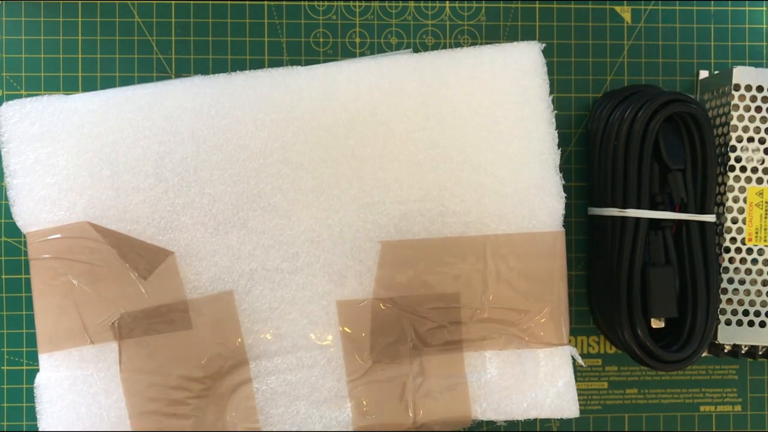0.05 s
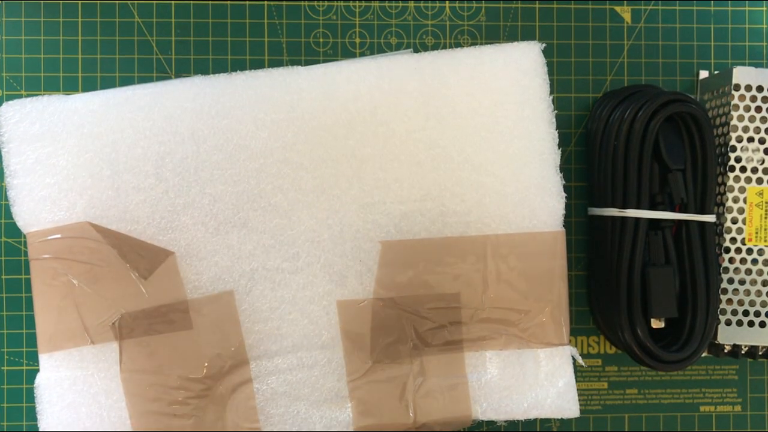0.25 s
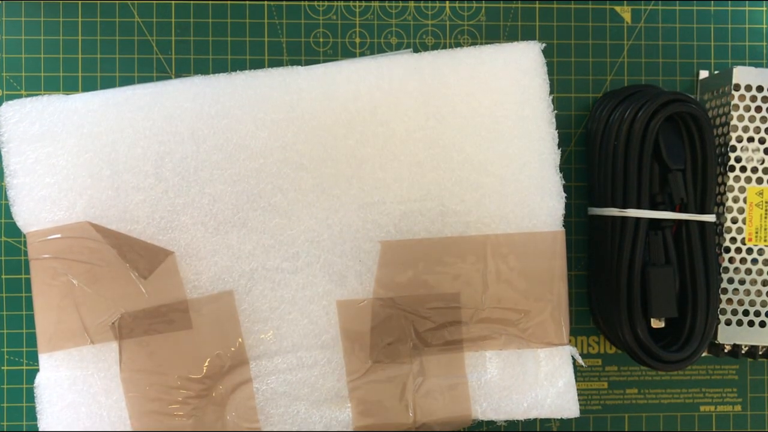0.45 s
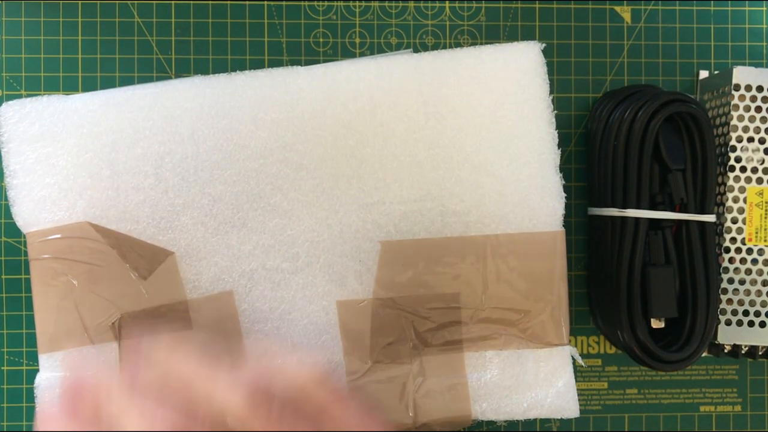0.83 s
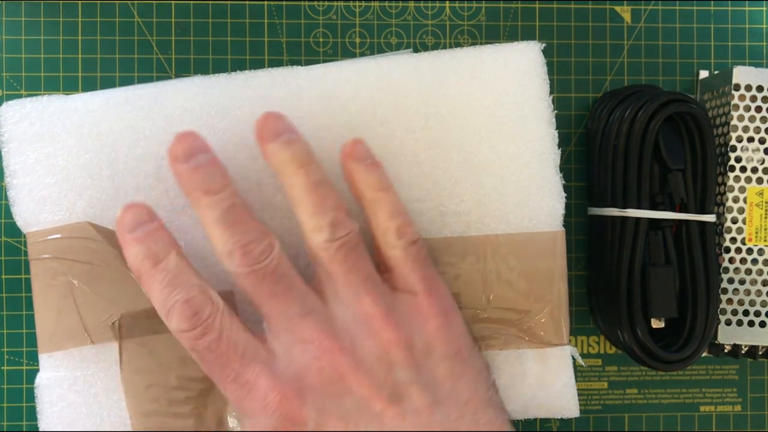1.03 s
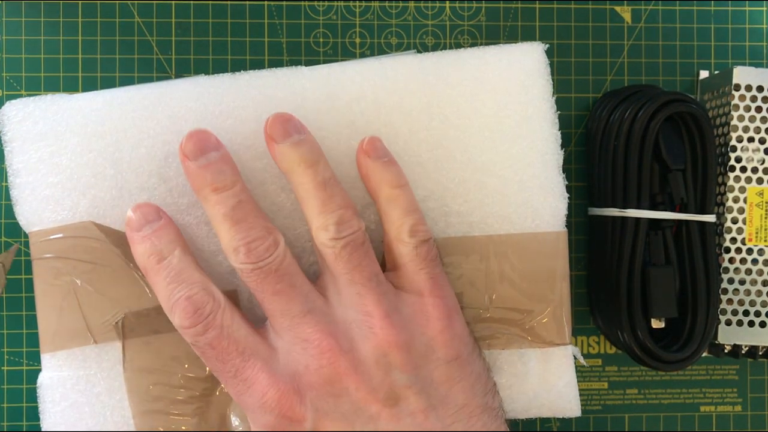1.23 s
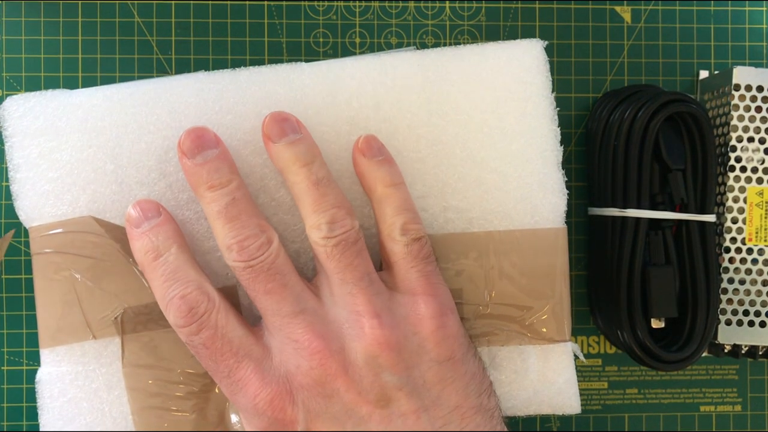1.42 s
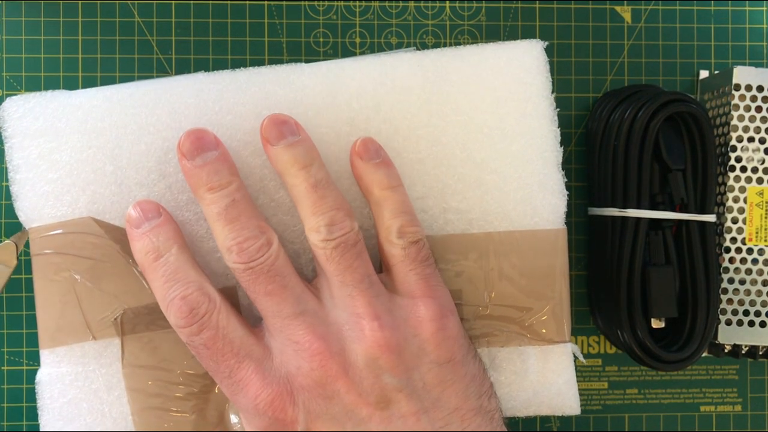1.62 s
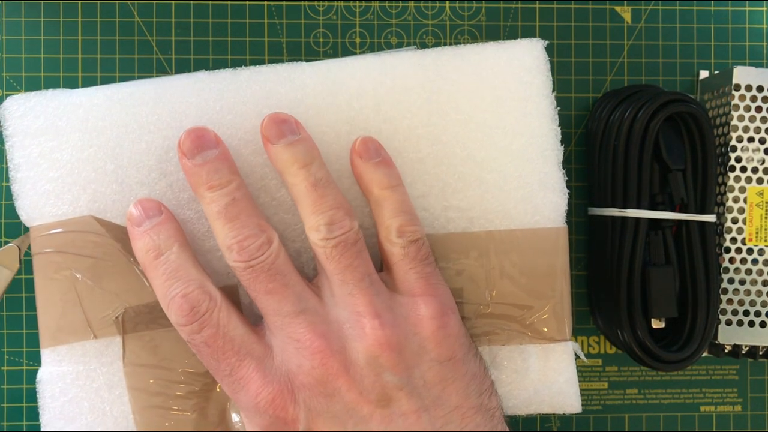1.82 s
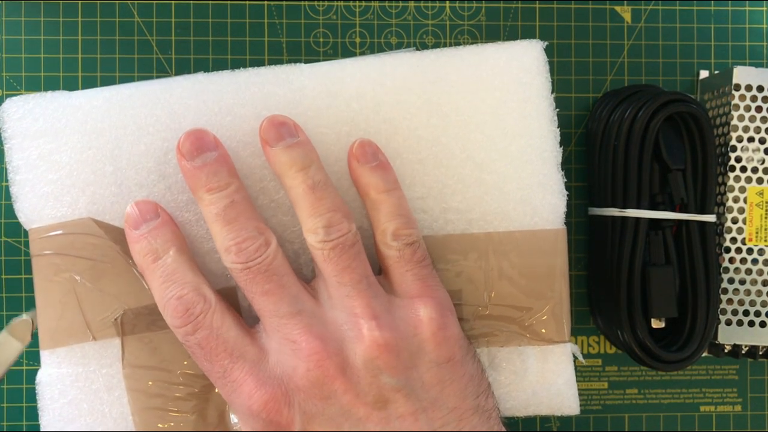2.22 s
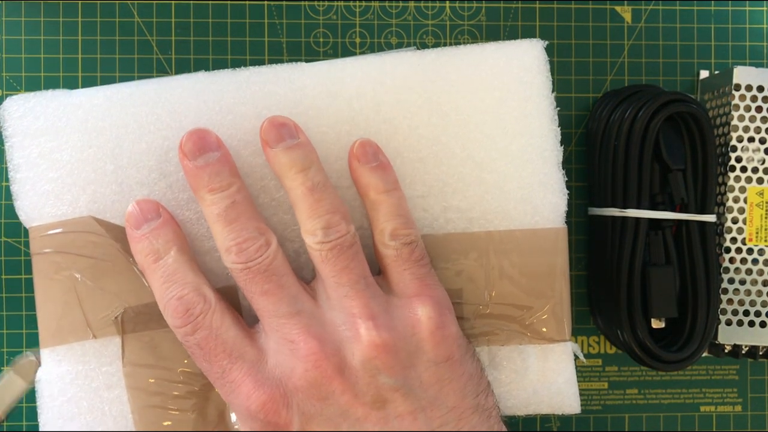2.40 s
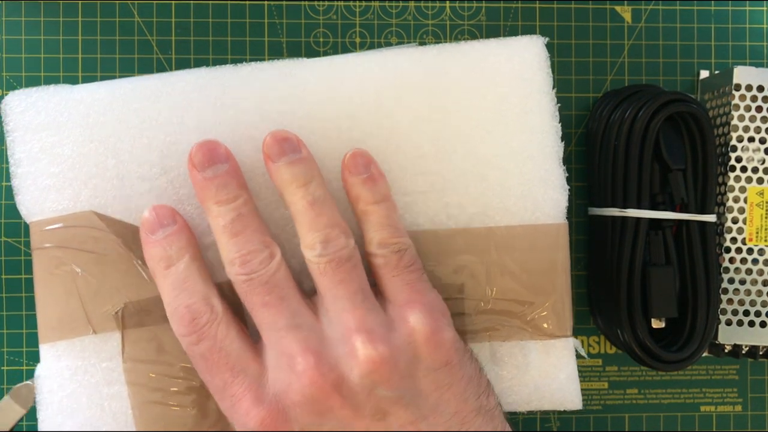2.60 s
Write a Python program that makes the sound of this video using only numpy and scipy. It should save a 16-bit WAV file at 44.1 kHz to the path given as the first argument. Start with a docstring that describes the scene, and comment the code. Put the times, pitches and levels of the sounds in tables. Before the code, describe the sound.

Sharp box cutter clicks, followed by the blade snapping through tape and rasping into foam.

```python
"""Close up in a small room, a box cutter's blade is pushed out over six ratchet notches, each rattling the
handle and ringing blade and spring. About a second in, a hand settles on a foam-wrapped parcel.
Near two seconds the blade snaps through packing tape in jerks that ring the parcel, and at last it
slides on through the foam with a soft rasp. All along the desk sways under the hand, over a faint hum."""
import sys
import numpy as np
from scipy import signal
from scipy.fft import rfft, irfft
from scipy.io import wavfile

SR = 44100
rng = np.random.default_rng(int(sys.argv[2]) if len(sys.argv) > 2 else 0)


def materialize(psi):
    """Save the field psi as 16-bit PCM at rate SR to the path in sys.argv[1].

    A 1-D psi becomes a single channel; in a 2-D psi each row is a channel.
    """
    bounded = np.clip(np.atleast_2d(psi).T, -1, 1)
    quanta = np.round(bounded * 32767).astype(np.int16)
    wavfile.write(sys.argv[1], SR, quanta)


N = 121275
T = np.arange(N) / SR

# Ratchet clicks, six firm among lighter ones: t/s, rattle level/dB, decay/s, blade f/Hz,
# blade level/dB, spring level/dB, hollow f/Hz
NOTCHES = [(0.1929, -36.5, 0.0095, 7800, -38, -44.5, 3080), (0.2217, -9, 0.0025, 7800, 2, 4, 3080),
           (0.2612, -9, 0.0024, 7300, 2, 6, 3120), (0.3033, -10.5, 0.0029, 7650, 6, 5.5, 2780),
           (.3400, -10, 0.003, 7000, -4, 5, 2500), (0.3803, -7.5, 0.0028, 7100, 0, 5, 2500),
           (0.4292, -3.5, 0.0024, 9700, 10.5, -2, 4180), (0.548, -40, 0.0013, 7000, -33, -38, 2700),
           (0.555, -19, 0.0027, 7270, -12, -23, 2760)]
# Tone of the handle: f/Hz, level/dB
HANDLE_EQ = [(300, -30.5), (520, -27.5), (680, -13.5), (950, -12), (1250, -19), (2500, -5.5), (3100, -10),
             (4200, -6), (5100, -8), (7600, -2), (10000, -1.5), (11200, -4), (15300, -5), (16500, 0)]

def rattle():
    """The slider scrapes along the handle and rattles it at each notch."""
    hits = sum(amp(db) * burst(at, decay, grain_db=7) for at, db, decay, *_ in NOTCHES)
    sliding = (T > NOTCHES[1][0]) & (T < NOTCHES[-2][0])
    scrape = amp(-42.5) * sliding * crackle(3500, spread_db=0.5)
    return colour(hits + scrape, HANDLE_EQ)

# Glassy ping of the slider's spring: f/Hz, width/Hz, level/dB
SPRING_MODES = [(13700, 430, -3), (14100, 600, 2.5)]

def chime():
    """Each notch rings spring, blade and hollow handle; the last two retune as the blade moves out."""
    out = 0
    for at, db, _, blade_hz, blade_db, spring_db, hollow_hz in NOTCHES:
        strike = impulse(at)
        blade = amp(blade_db) * ring(strike, [(blade_hz, 800, 0)])
        hollow = amp(db + 1) * ring(strike, [(hollow_hz, 380, 0)])
        spring = amp(spring_db) * ring(strike, SPRING_MODES)
        out = out + blade + hollow - spring
    return cut(out, 1700, "high")

# Jerks through the tape: t/s, snap level/dB, parcel ring level/dB, decay/s, low-pass f/Hz
JERKS = [(1.864, -23, -44, 0.0013, 16000), (1.898, -28.5, -30, 0.0047, 12000),
         (1.9023, -10.5, -21, 0.0033, 6000), (1.9327, -17.5, -35, 0.0015, 12900),
         (1.939, -20, -31, 0.0027, 8000), (1.9496, -22.5, -27.5, 0.0035, 12200),
         (2.030, -34.5, -31, 0.0049, 14000), (2.036, -28, -35, 0.0011, 14000),
         (2.063, -22, -38, 0.0027, 14900), (2.068, -26.5, -33.5, 0.004, 8000),
         (2.084, -23, -28.5, 0.0038, 10100), (2.107, -29, -66, 0.0014, 9900),
         (2.134, -32.5, -37, 0.003, 11700), (2.1638, -30, -37.5, 0.0036, 9700),
         (2.175, -26, -54, 0.00061, 15300), (2.18, -25, -30.5, 0.0015, 5970),
         (2.2065, -33.5, -35, 0.0093, 10300), (2.238, -26, -52, 0.0012, 15100),
         (2.2464, -22.5, -34, 0.0024, 11000), (2.2516, -27, -30.5, 0.0045, 10900),
         (2.295, -21, -38, 0.0021, 13500), (2.303, -20.5, -36, 0.0017, 9000),
         (2.325, -31, -55, 0.0094, 10000), (2.337, -29, -35, 0.0048, 8950),
         (2.344, -18.5, -32, 0.001, 16000), (2.3468, -21, -32, 0.0035, 10000),
         (2.3528, -25, -28, 0.0023, 9000), (2.383, -30.5, -37, 0.0019, 14300),
         (2.466, -28.5, -41, 0.0025, 13800)]
# Gritty drag under the snaps: t/s, level/dB
DRAG_FADER = [(1.84, -63), (1.89, -45.5), (1.92, -39.5), (1.96, -41.5), (2.01, -54), (2.08, -46.5),
              (2.15, -51.5), (2.21, -45.5), (2.28, -52.5), (2.37, -47), (2.42, -57), (2.55, -58),
              (2.75, -53.5)]
# Bite of a tape snap: f/Hz, level/dB
TAPE_EQ = [(400, -14), (1500, -9.5), (2700, -6), (4200, -8.5), (7000, 0), (8300, -3.5), (11000, -8.5),
           (13200, 0.5), (16000, -9)]
# Boxy body of the parcel: f/Hz, width/Hz, level/dB
PARCEL_MODES = [(438, 92, -3), (500, 137, -2), (735, 65, -2.5), (1192, 120, -5), (2600, 460, -12.5),
                (3700, 2900, -24.5)]
# Dull knocks as the parcel springs back: peak t/s, level/dB, f/Hz
KNOCKS = [(1.906, -16, 522), (1.9415, -20, 560), (2.0745, -26, 650), (2.2126, -33.5, 407),
          (2.256, -29, 483), (2.349, -28.5, 618)]

def tape():
    """The blade drags and jerks through fraying tape; the parcel rings and springs back."""
    drag = curve(DRAG_FADER) * crackle(1500, spread_db=0)
    fray = sum(amp(db - 13.5) * np.exp(-np.abs(T - at) / 0.0022) for at, db, *_ in JERKS) * noise()
    snaps = cut(amp(-1) * drag + fray, 9530, "low")
    push = amp(4) * drag
    for at, snap_db, ring_db, decay, bright_hz in JERKS:
        tear = burst(at, decay, grain_db=5.5)
        strength = np.linalg.norm(tear)
        crack = amp(-6) * strength * impulse(at)
        release = strength * impulse(at + 0.00101)  # kicks the parcel just after the crack
        snaps += amp(snap_db) * cut(crack + tear, bright_hz, "low")
        push += amp(ring_db) * (release + tear)
    body = cut(ring(push, PARCEL_MODES), 315, "high", order=4)
    thump = amp(-5.5) * cut(ring(drag, [(106, 200, 0)]), 380, "low")
    knocks = sum(amp(db) * knock(at, hz, rise=0.0022, fall=0.003) for at, db, hz in KNOCKS)
    return colour(snaps, TAPE_EQ) + thump + knocks + cut(body, 4900, "low")

# Swell of the rasp: t/s, level/dB
RASP_FADER = [(2.38, -64), (2.46, -51.5), (2.51, -44), (2.56, -45.5), (2.62, -42), (2.68, -45), (2.75, -38)]
# Tone of parting foam: f/Hz, level/dB
FOAM_EQ = [(200, -18.5), (600, -14.5), (1050, 0), (1350, -9), (1750, 2), (2100, -4.5), (3400, -8.5),
           (4300, -13.5), (6200, -8), (8200, -8.5), (11000, -16.5), (12700, -10.5), (16000, -22.5)]
# Ticks of the blade: t/s, level/dB
BLADE_TICKS = [(2.518, -27.5), (2.5234, -25)]

def foam():
    """Foam cells part densely along the edge; the blade ticks in its holder."""
    rasp = curve(RASP_FADER) * colour(crackle(7700, spread_db=1.5), FOAM_EQ)
    ticks = sum(amp(db) * burst(at, decay=0.00073) for at, db in BLADE_TICKS)
    return rasp + ring(ticks, [(3210, 350, 0)]) + colour(ticks, TAPE_EQ)

# Fingers landing on the foam: t/s, level/dB, decay/s
PATS = [(0.980, -44.5, 0.012), (1.053, -41, 0.006), (1.061, -36.5, 0.013), (1.346, -49.5, 0.0055)]
# Padded tone of a pat: f/Hz, level/dB
PAT_EQ = [(100, -2.5), (250, 3.5), (560, -0.5), (680, 4.5), (860, -6.5), (1500, -1.5), (2000, -6),
          (2450, -0.5), (4000, -16.5), (8000, -13), (15000, -47)]
# Rustle under the resting hand: t/s, level/dB
PRESS_FADER = [(.96, -64), (1.02, -55), (1.085, -48), (1.125, -60.5), (1.19, -70.5), (1.27, -57.5),
               (1.36, -63), (1.45, -75)]
# Dark tone of pressed foam: f/Hz, level/dB
PRESS_EQ = [(200, 1), (700, -7), (2500, -12.5), (5000, -17), (15000, -23.5)]
# Light brushes on the wrapping: peak t/s, level/dB, half length/s
BRUSHES = [(0.071, -51.5, 0.022), (0.817, -52, 0.016), (1.349, -51, 0.0036), (1.487, -52.5, 0.0052),
           (1.603, -56.5, 0.012), (1.801, -57, 0.029)]
# Whisper of skin: f/Hz, level/dB
SKIN_EQ = [(500, 6), (3000, -5), (5000, -7.5), (7500, 2.5), (11000, -2.5), (13000, -1.5), (16000, -14)]

def hand():
    """Fingers pat, press and brush the wrapping; the palm gives the parcel a hollow tap."""
    pats = sum(amp(db) * burst(at, decay, grain_db=2) for at, db, decay in PATS)
    tap = amp(-36) * knock(at=1.064, hz=683, rise=0.0058, fall=0.0058)
    rustle = curve(PRESS_FADER) * crackle(1500, spread_db=6)
    touch = sum(amp(db) * np.exp(-((T - at) / half) ** 2) for at, db, half in BRUSHES)
    brushes = touch * crackle(3980, spread_db=7)
    return colour(pats, PAT_EQ) + tap + colour(rustle, PRESS_EQ) + colour(brushes, SKIN_EQ)

# Sub-bass swells of the desk: t/s, level/dB
SWAY_FADER = [(0, -37.5), (.6, -43), (.95, -46.5), (1.04, -33.5), (1.3, -33.5), (1.42, -36.5), (1.8, -44),
              (2.02, -39), (2.12, -28), (2.19, -39), (2.28, -25.5), (2.38, -41), (2.46, -27), (2.56, -44),
              (2.75, -38)]

def desk():
    """The desk sways under the hand with a very low, wandering wobble."""
    wander = unit(ring(noise(), [(13.1, 31, 0)]))
    return curve(SWAY_FADER) * tone(20.6 * (1 + 0.14 * wander))

# Tone of the walls' echo: f/Hz, level/dB
WALL_EQ = [(200, -7), (1000, -4.5), (2000, -4), (3700, -2), (5600, -2), (7500, -6), (9500, -0.5),
           (12500, -7), (16000, -14)]

def room(x):
    """One wall slaps back inside a diffuse tail whose treble the air soaks up."""
    t60_s, build_s, slap_s, air_hz = 0.53, 0.005, 0.0255, 13500
    hz, times, cells = signal.stft(rng.standard_normal(SR), SR)
    decay_rate = np.log(1000) / t60_s * (1 + (hz / air_hz) ** 2)
    tail = signal.istft(cells * np.exp(-np.outer(decay_rate, times)), SR)[1][:SR]
    tail *= 1 - np.exp(-T[:SR] / build_s)
    echoes = amp(-13.5) * tail / np.linalg.norm(tail) + amp(-19.5) * impulse(slap_s)[:SR]
    return signal.fftconvolve(x, colour(echoes, WALL_EQ))[:N]

# Bass-heavy bed of room noise: f/Hz, level/dB
BED_EQ = [(21, -35.5), (35, -4.5), (82, -19.5), (120, -23.5), (151, -27), (258, -24), (317, -31.5),
          (819, -38.5), (1300, -42), (1510, -43), (1810, -44), (2110, -46), (3910, -49.5), (16000, -50)]
# Low hum: f/Hz, width/Hz, level/dB
HUM_BANDS = [(93.3, 13.3, -54), (157.5, 3.5, -65)]

def room_tone():
    """Steady room noise with a hum and a thin, even whine."""
    hum = sum(amp(db) * unit(ring(ring(noise(), [(hz, width, 0)]), [(hz, width, 0)]))
              for hz, width, db in HUM_BANDS)
    waver = unit(cut(noise(), 14, "low"))
    whine = amp(-69) * tone(1500 * (1 + 0.00386 * waver))
    return amp(-48) * unit(colour(noise(), BED_EQ)) + hum + whine

def burst(at, decay, grain_db=0):
    """Micro-impacts that build fast and die away: even in the bass, ragged in the treble."""
    size, contact_s, even_below_hz = 4096, 0.00028, 790
    sign, grain = rng.standard_normal((2, size))
    age = T[1:size + 1]
    fade = np.exp(-age / decay)
    x = np.sign(sign) * amp(grain_db * grain) * fade * (1 - np.exp(-age / contact_s))
    evenness = 1 / (1 + (np.fft.rfftfreq(size, 1 / SR) / even_below_hz) ** 2)
    spectrum = rfft(x / np.linalg.norm(x))
    x = irfft(spectrum / (np.abs(spectrum) + 1e-12) ** evenness) * fade ** 0.1
    x *= np.sqrt(decay * SR / 2 / np.sum(x ** 2))  # starting level near 1
    return np.concatenate([np.zeros(int(at * SR)), x, np.zeros(N)])[:N]

def knock(at, hz, rise, fall):
    """A few heavily damped swings that peak at the given time."""
    age = T - at
    return np.exp(-(age / np.where(age < 0, rise, fall)) ** 2) * np.sin(2 * np.pi * hz * age)

def crackle(per_s, spread_db):
    """Tiny random clicks whose levels scatter by spread_db."""
    clicks = (rng.random(N) < per_s / SR) * np.sign(noise())
    return unit(clicks * amp(spread_db * np.clip(noise(), -2, 2)))

def ring(x, modes):
    """Decaying resonances (f/Hz, width/Hz, level/dB) that keep the power of white noise."""
    t = T[:SR // 4]
    response = sum(amp(db) * width * np.exp(-np.pi * width * t) * np.cos(2 * np.pi * hz * t)
                   for hz, width, db in modes)
    response[0] /= 2
    return signal.fftconvolve(x, response / np.linalg.norm(response))[:N]

def colour(x, points):
    """EQ through (f/Hz, level/dB) points that keeps the power of white noise."""
    hz, db = np.array(points).T
    size = 8192
    f = np.maximum(np.fft.rfftfreq(size, 1 / SR), 1)
    gain = amp(np.interp(np.log(f), np.log(hz), db)) / np.sqrt(1 + (hz[0] / 2 / f) ** 4)
    cepstrum = irfft(np.log(gain))
    cepstrum[1:size // 2] *= 2  # minimum phase: nothing rings ahead of a hit
    cepstrum[size // 2 + 1:] = 0
    response = irfft(np.exp(rfft(cepstrum)))
    return signal.fftconvolve(x, response / np.linalg.norm(response))[:N]

def cut(x, hz, kind, order=2):
    """Low-pass or high-pass."""
    return signal.sosfilt(signal.butter(order, hz, kind, fs=SR, output="sos"), x)

def curve(points):
    """Fader ride along (t/s, level/dB) points."""
    return amp(np.interp(T, *np.array(points).T, left=-120))

def tone(hz):
    """Sine that follows a moving pitch."""
    return unit(np.sin(2 * np.pi * np.cumsum(hz) / SR))

def impulse(at):
    return signal.unit_impulse(N, int(at * SR))

def noise():
    return rng.standard_normal(N)

def amp(db):
    return 10 ** (np.asarray(db) / 20)

def unit(x):
    return x / np.sqrt(np.mean(x ** 2))

def scene():
    """The mono mix; the cutter throws a different rattle in each direction, so its echo is smooth."""
    directions = 3
    parcel = tape() + foam() + hand()
    rings = chime()
    rattle_echo = sum(room(rattle()) for _ in range(directions)) / np.sqrt(directions)
    chime_echo = amp(-9) * room(rings)
    cutter = rattle() + rings + rattle_echo + chime_echo
    parcel_echo = amp(-1) * room(cut(parcel, 12000, "low"))
    return (cutter + parcel + parcel_echo + desk() + room_tone())[None]

def record(dry):
    """A steep low-pass shaves off the very top."""
    return signal.sosfilt(signal.ellip(8, .2, 70, 15850, fs=SR, output="sos"), dry)

dry = scene()
out = record(dry)
materialize(out)
```